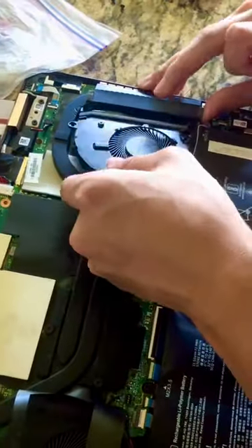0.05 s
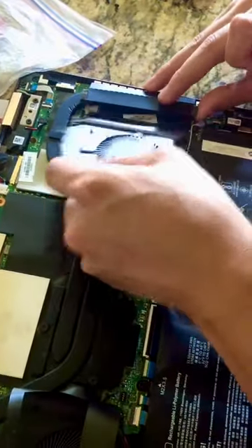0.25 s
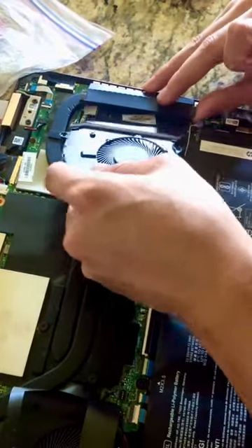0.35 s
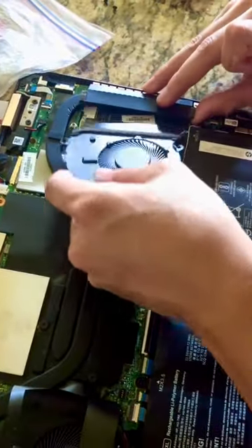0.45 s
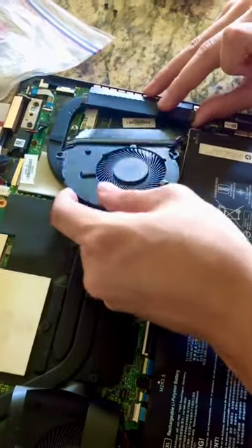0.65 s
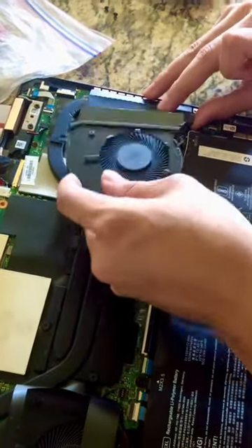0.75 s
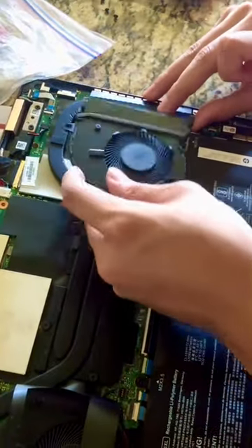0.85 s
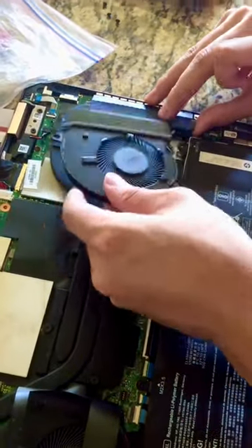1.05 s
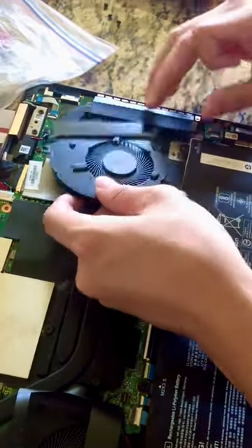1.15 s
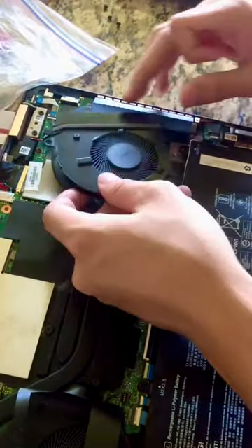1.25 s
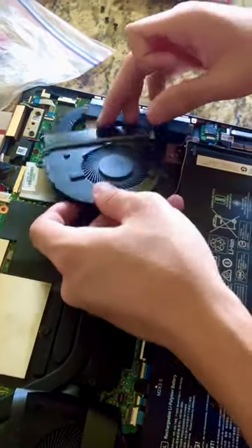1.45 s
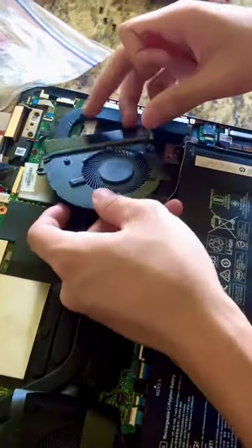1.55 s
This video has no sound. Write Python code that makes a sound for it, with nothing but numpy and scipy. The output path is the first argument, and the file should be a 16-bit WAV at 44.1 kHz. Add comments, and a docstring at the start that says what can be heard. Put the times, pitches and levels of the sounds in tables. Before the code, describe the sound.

A small cooling fan clicks and scrapes against a laptop case from about 0.15 seconds, snapping free with a sharp metallic crack at 0.3 seconds, the loudest moment. Its thin metal cover clinks lightly at 0.6 and 0.75 seconds. Soft ticks come near 1.1 seconds, then faint scrapes and clinks from 1.4 to 1.55. The room echoes briefly, with a faint throbbing appliance hum underneath.

```python
"""A cooling fan is worked loose and lifted out of an open laptop on a kitchen counter.
From the start, an appliance hums with a slow throb over the soft rush of the room's air.
The fan's plastic frame scrapes and ticks against the case, then snaps free at about 0.3 seconds.
Next its thin metal cover clinks twice. A few light ticks, scrapes and faint clinks come last.
The room rings briefly after each sound."""
import sys
import numpy as np
from scipy import signal
from scipy.fft import rfft, irfft
from scipy.io import wavfile
from scipy.ndimage import uniform_filter1d

SR = 44100
rng = np.random.default_rng(int(sys.argv[2]) if len(sys.argv) > 2 else 0)


def wav_out(sig):
    """Save sig, one row per channel (or a flat mono array), as 16-bit PCM at SR to the path in sys.argv[1]."""
    wavfile.write(sys.argv[1], SR, np.round(np.clip(np.atleast_2d(sig).T, -1, 1) * 32767).astype(np.int16))


N = 70560  # 1.6 seconds


def amp(db):
    """Turns decibels (dB) into a number to multiply a sound by."""
    return 10 ** (np.asarray(db) / 20)


def unit(x):
    """Scales a sound to an average (rms) level of one."""
    return x / np.sqrt(np.mean(x ** 2) + 1e-20)


def read(points, hz):
    """Looks up values between a table's rows, with frequency spaced in octaves."""
    known_hz, value = np.transpose(points)
    return np.interp(np.log(hz + 1), np.log(known_hz + 1), value)


def add(mix, start_s, sound):
    """Adds a sound to the mix at the given time."""
    part = mix[max(round(start_s * SR), 0):][:len(sound)]
    part += sound[:len(part)]


def colour(x, spectrum, tilt=0):
    """Shapes a sound's lows and highs, at level one. Tilt adds dB per octave above 1000 Hz."""
    hz = np.fft.rfftfreq(len(x), 1 / SR)
    octaves = np.log2(np.maximum(hz, 1000) / 1000)
    return unit(irfft(rfft(x) * amp(read(spectrum, hz) + tilt * octaves), len(x)))


def evened(x, width_hz=250):
    """Flattens the broad peaks and dips in a noise's spectrum and keeps the fine ones."""
    spectrum = rfft(x)
    power = uniform_filter1d(abs(spectrum) ** 2, int(width_hz * len(x) / SR) + 1)
    return irfft(spectrum / np.sqrt(abs(power) + 1e-20), len(x))


def fade(t, fade_s):
    """Dies away by 60 dB in the fade time, fade_s."""
    return np.exp(-np.log(1000) * t / fade_s)


def envelope(t, rise_s, fade_s):
    """Swells up, then dies away."""
    return (1 - np.exp(-t / rise_s)) * fade(t, fade_s)


def burst(spectrum, tilt, rise_s, fade_s, size=4096):
    """A short noise, like many close tones struck together and dying quickly."""
    shape = envelope(np.arange(size) / SR, rise_s, fade_s)
    noise = unit(evened(rng.standard_normal(size) * shape))
    return colour(noise, spectrum, tilt)[:size // 2] * np.sqrt(np.mean(shape ** 2))


def room_air(level_db=-64.5):
    """The air in the room makes a soft, low, steady rush."""
    # The tone of the air. Each row: frequency in Hz, relative strength in dB.
    air_spectrum = [(25, -33.5), (50, -12.5), (75, 4), (100, 1), (150, 0), (230, 1.5), (360, 3.5),
                    (540, 0.5), (750, -9), (1100, -10.5), (1800, -16.5), (3000, -23.5), (6000, -26),
                    (12000, -27.5), (16000, -29.5)]
    return amp(level_db) * colour(rng.standard_normal(N), air_spectrum)


def appliance_hum():
    """An appliance hums: one tone throbs slowly while fainter ones waver in pitch."""
    # The fainter tones. Each row: pitch in Hz, level in dB.
    faint_tones = [(80.5, -71), (266, -83), (355.3, -72.5), (446.8, -79), (531, -80.5), (1750, -81.5)]
    throb_hz, throb_db = 176.9, -64.5
    swing_db, throbs_per_s, first_peak_s = 6, 3.08, 0.165
    waver_hz, waver_radians = 7.1, 0.28
    t = np.arange(N) / SR
    throb = swing_db * np.cos(2 * np.pi * throbs_per_s * (t - first_peak_s))
    out = amp(throb_db + throb) * np.sin(2 * np.pi * (throb_hz * t + rng.random()))
    keep_slow = 1 / (1 + (np.fft.rfftfreq(N, 1 / SR) / waver_hz) ** 2) ** 2
    for hz, db in faint_tones:
        waver = unit(irfft(rfft(rng.standard_normal(N)) * keep_slow, N))
        out += amp(db) * np.sin(2 * np.pi * hz * t + waver_radians * waver)
    return np.sqrt(2) * out


def room_echo(sound):
    """Sound bounces quickly off the counter and case, then the room's echo builds and dies away."""
    # The room's long echo. Each row: frequency in Hz, fade time in seconds, level in dB.
    echo_bands = [(249.3, 0.2, -15.5), (1007, 0.8, -12.5), (2303, .68, -15.5), (5490, .56, -18),
                  (7700, .58, -15.5), (10660, 0.61, -21.5), (15000, 0.73, -18.5)]
    first_echo_s, build_s = 0.002, 0.012
    near_db, near_fade_s = -12, 0.052
    band_hz, fade_s, db = np.transpose(echo_bands)
    t = np.arange(SR) / SR
    late, near = rng.standard_normal((2, SR)) * (t > first_echo_s)
    # Split the noise by frequency so that each part fades at its own speed.
    hz, times, parts = signal.stft(late * (1 - np.exp(-t / build_s)), SR, nperseg=256)
    parts = parts * fade(times, read(np.c_[band_hz, fade_s], hz)[:, None])
    tail = signal.istft(parts, SR, nperseg=256)[1][:SR]
    tail_gains = amp(read(np.c_[band_hz, db], np.fft.rfftfreq(SR, 1 / SR)))
    tail = irfft(rfft(evened(tail)) * tail_gains, SR)
    near = amp(near_db) * evened(near * fade(t, near_fade_s))
    return signal.fftconvolve(sound, (tail + near)[:SR * 3 // 4])[:N]


def frame_scrapes():
    """The plastic frame slides on the case in many tiny, uneven slips that blur into a scrape."""
    # The slides. Each row: start in seconds, length in seconds, level in dB, tilt in dB per octave.
    slides = [(0.135, 0.042, -73.5, 0), (0.175, 0.024, -64, 8), (0.21, 0.048, -70.5, -2),
              (0.252, 0.0255, -45.5, -3), (0.279, .019, -41.5, 0.5), (0.3, 0.014, -42.5, 2),
              (0.539, 0.17, -74, -1), (0.721, 0.018, -61, 1), (1.088, 0.072, -75.5, 0.5),
              (1.382, 0.038, -70.5, 9.5), (1.447, 0.032, -72, 5), (1.483, .11, -73.5, 4)]
    # The tone of a scrape. Each row: frequency in Hz, relative strength in dB.
    scrape_spectrum = [(200, -18.5), (700, -3.5), (1200, -7.5), (1900, -2), (3200, -5.5), (4600, 1.5),
                       (6200, 1.5), (8500, -6), (10700, 2), (13000, -8), (16000, -13)]
    slips_per_s, spread_db = 6300, 2
    out, samples = np.zeros(N), SR // 4
    for start_s, length_s, db, tilt in slides:
        slipping = rng.random(samples) < slips_per_s / SR
        strength = amp(spread_db * np.minimum(rng.exponential(1, samples), 4))
        direction = rng.choice([-1., 1.], samples)
        scrape = colour(slipping * direction * strength, scrape_spectrum, tilt)[:int(length_s * SR)]
        soft_ends = np.hanning(len(scrape)) ** 0.35
        add(out, start_s, amp(db) * scrape * soft_ends)
    return out


def frame_ticks():
    """The plastic frame knocks on the case: each dry tick comes with a small thud of the case."""
    # The knocks. Each row: start in seconds, tick level in dB, tick tilt in dB per octave,
    # thud level in dB, thud pitch in Hz.
    knocks = [(0.1545, -55.5, -7.5, -54, 780), (0.1884, -49.5, -7.5, -53, 674),
              (0.1920, -63, -2.5, -47.5, 520), (0.2050, -31, 0, -55, 714), (0.2079, -36.5, 0.5, -38.5, 675),
              (0.2517, -39.5, 0.5, -48.5, 650), (0.2609, -38, -1.5, -52.5, 676),
              (0.2680, -38, -14, -43, 753), (0.2770, -35, 6, -44, 648), (0.2900, -51, 6.5, -38.5, 701),
              (0.2996, -40.5, -2, -68, 650), (0.3100, -40, -6, -42, 680), (0.3310, -50.5, 13, -56.5, 650),
              (0.662, -65, 19, -87, 644), (1.1327, -45.5, -3.5, -50.5, 487), (1.1385, -48.5, 9, -53.5, 460),
              (1.145, -52, 14, -53, 451), (1.4119, -49, 3, -72.5, 606), (1.5405, -53.5, -13, -61.5, 506)]
    # The tone of a tick. Each row: frequency in Hz, relative strength in dB.
    tick_spectrum = [(200, -16.5), (900, -17.5), (1500, -3), (2500, 4), (3700, -8), (5800, 0.5),
                     (8500, -5.5), (10600, -6), (12500, -11), (16000, -11)]
    # The tone of a thud. Each row: multiple of the thud's pitch, relative strength in dB.
    thud_shape = [(.2, -23), (.45, -3.5), (.8, 2.5), (1.3, 3), (1.8, -15), (2.8, -14), (4.6, -18),
                  (12, -62.5)]
    out = np.zeros(N)
    for start_s, tick_db, tilt, thud_db, thud_hz in knocks:
        thud_spectrum = [(multiple * thud_hz, db) for multiple, db in thud_shape]
        add(out, start_s, amp(tick_db) * burst(tick_spectrum, tilt, rise_s=0.00021, fade_s=0.013))
        add(out, start_s, amp(thud_db) * burst(thud_spectrum, tilt=0, rise_s=0.0014, fade_s=0.028))
    return out


def cover_clinks():
    """Each hit makes the metal cover give a sharp crack and ring; pressure on it shortens the ring."""
    # The hits. Each row: start in seconds, ring level in dB, ring tilt in dB per octave,
    # share of the free fade time, how firmly the cover sits in the case from 0 to 1,
    # crack level in dB, crack tilt in dB per octave.
    hits = [(0.2546, -32.5, -1.5, .3, 0.8, -28.5, 6), (0.3087, -25.5, -4, 0.51, 1, -23, -2.5),
            (0.3096, -20.5, 3.5, 0.35, 0.97, -23.5, 1), (0.3130, -40, -6.5, .6, 0.83, -32.5, -4),
            (0.5825, -38.5, -0.1, 0.8, 0, -44, -5.5), (0.7295, -39, 22, 0.77, 0.1, -56, 17),
            (0.7315, -48.5, 9.5, 0.73, 0.1, -54.5, -9.5), (0.741, -32.5, 2.5, 0.64, 0.01, -42.5, 0.5),
            (1.4202, -49, 0.5, 0.28, 0.52, -52.5, 5.5), (1.5162, -44, 1.5, 0.41, 0.3, -54.5, 5),
            (1.5385, -47.5, -1, 0.42, 0, -45, 6)]
    # The cover's ringing tones. Each row: pitch in Hz, relative strength in dB when lifted,
    # the same when seated in the case, fade time in seconds when free.
    cover_tones = [(1823, -6.5, -13, 0.099), (1980, -13, -9, .065), (2343, -13.5, -10, 0.077),
                   (2492, -9.5, -20.5, 0.06), (4210, -16.5, -15, 0.053), (4449, -16.5, -2.5, 0.048),
                   (4910, -12, -7, .05), (5190, -3, -2, 0.036), (5482, -2, -8.5, 0.063),
                   (5566, -8.5, -1.5, .06), (6540, -8.5, -13, 0.038), (10120, -4, -4, 0.022),
                   (10460, -5.5, -3.5, .035), (11160, -7.5, -8, .035), (11280, -18, -10.5, 0.012),
                   (12300, -21.5, -20, .03)]
    # The crack, made of crowded tones that die fast. Each row: frequency in Hz, relative strength in dB.
    crack_spectrum = [(200, -19.5), (600, -14), (1300, -29.5), (2100, -5.5), (3100, -7), (5400, 0.5),
                      (7000, -3), (8800, -13), (10400, -1), (12500, -10.5), (16000, -21.5)]
    spread_db = 2.5
    out, t = np.zeros(N), np.arange(SR // 4) / SR
    hz, lifted_db, seated_db, fade_s = np.transpose(cover_tones)[:, :, None]
    for start_s, ring_db, ring_tilt, fade_share, seated, crack_db, crack_tilt in hits:
        tone_db = lifted_db + seated * (seated_db - lifted_db)  # sitting in the case favours other tones
        gains = amp(tone_db + ring_tilt * np.log2(hz) + spread_db * rng.standard_normal(hz.shape))
        tones = np.sin(2 * np.pi * (hz * t + rng.random(hz.shape)))
        tones *= envelope(t, rise_s=0.00036, fade_s=fade_s * fade_share)
        ring = np.sqrt(2) * (gains * tones).sum(0) / np.linalg.norm(gains)
        add(out, start_s, amp(ring_db) * ring)
        add(out, start_s, amp(crack_db) * burst(crack_spectrum, crack_tilt, rise_s=0.00015, fade_s=0.02))
    return out


def scene():
    """Mixes the background, the sounds of the fan coming loose, and their echo."""
    background = room_air() + appliance_hum()
    cut_bass = signal.butter(3, 220, "high", fs=SR, output="sos")  # small parts give off no bass
    fan = signal.sosfilt(cut_bass, cover_clinks() + frame_ticks() + frame_scrapes())
    return (fan + room_echo(fan) + background)[None]


def record(dry):
    """Removes the very highest treble, above 15900 Hz."""
    cut_treble = signal.firwin(511, 15900, window=("kaiser", 9), fs=SR)
    return signal.oaconvolve(dry, cut_treble[None], "same")


dry = scene()
out = record(dry)
wav_out(out)
```